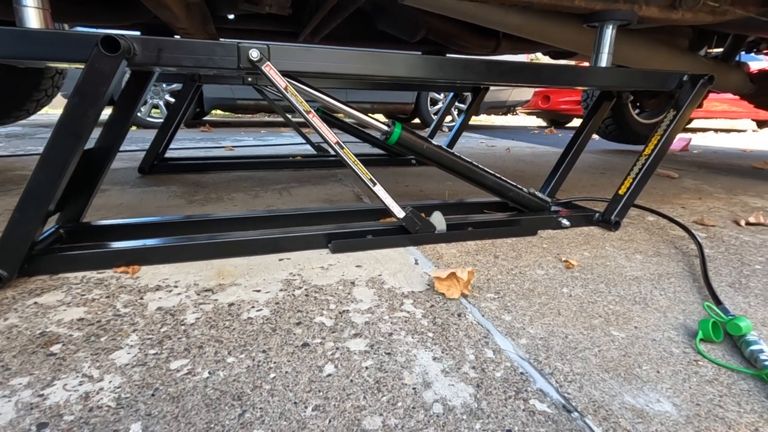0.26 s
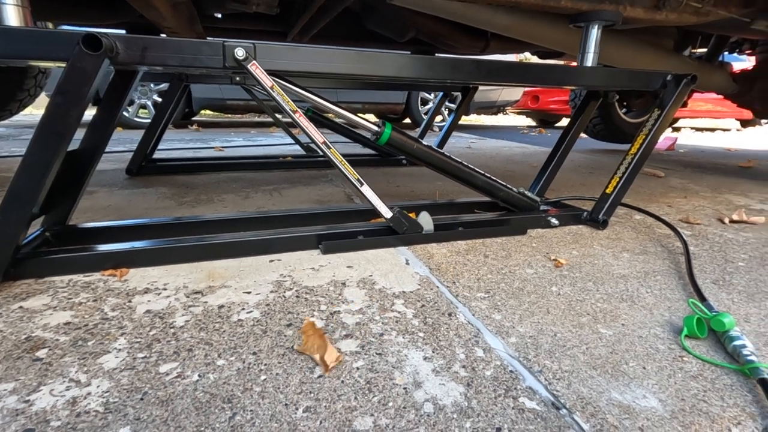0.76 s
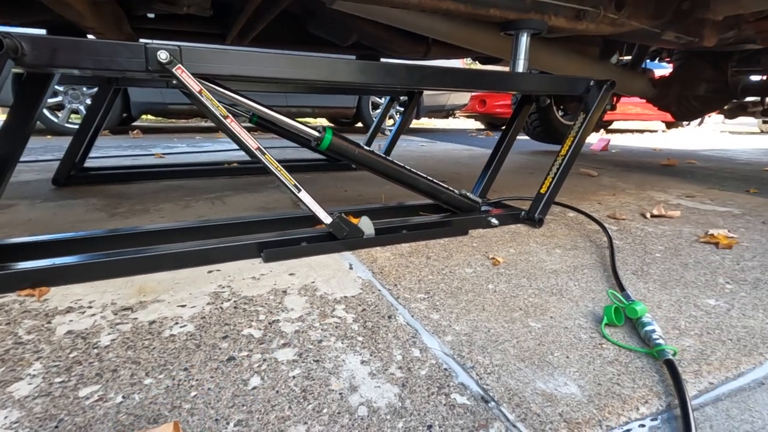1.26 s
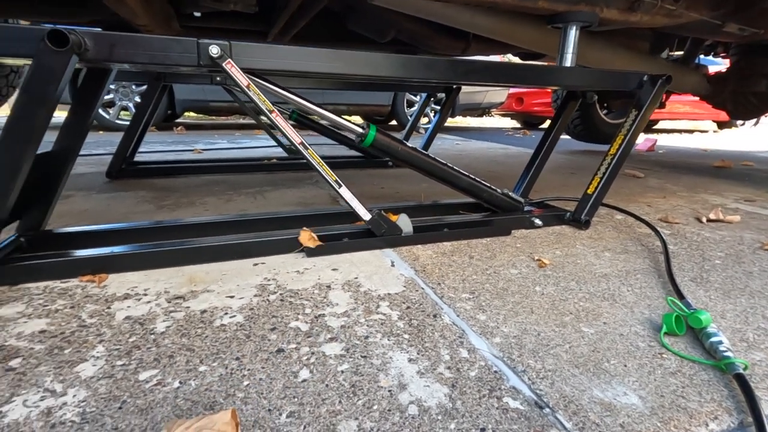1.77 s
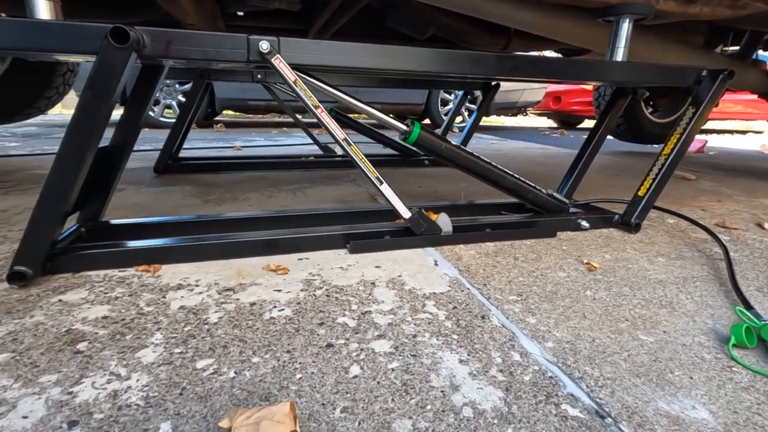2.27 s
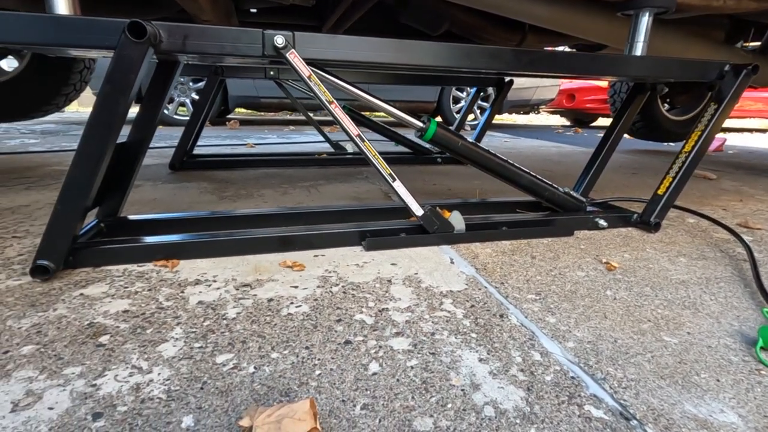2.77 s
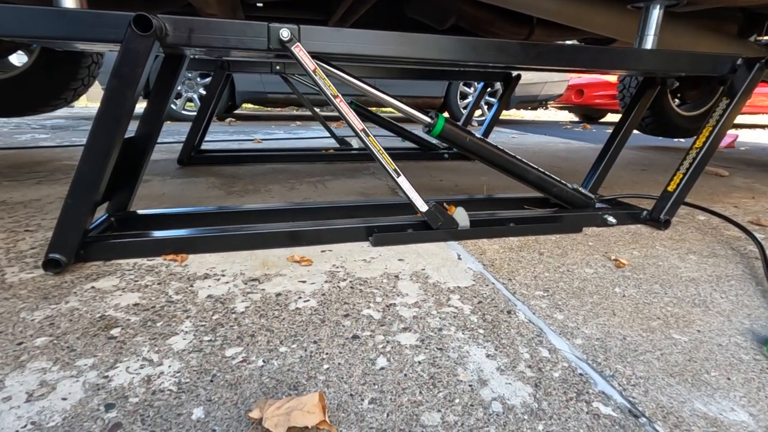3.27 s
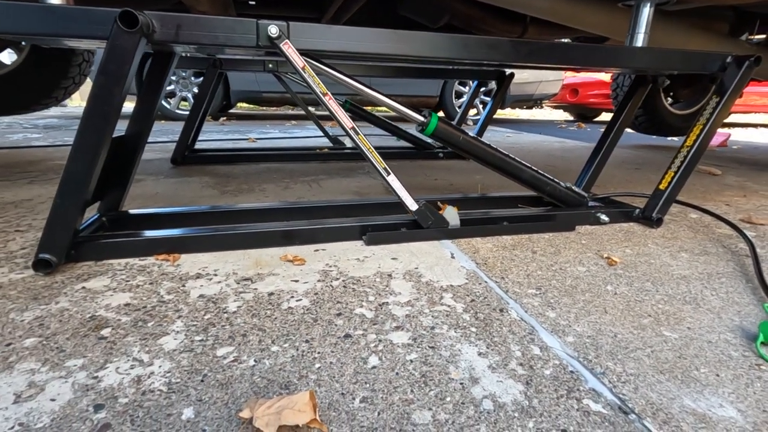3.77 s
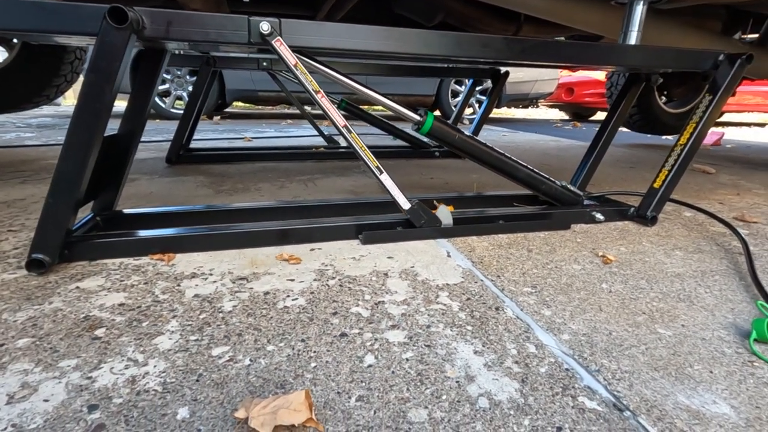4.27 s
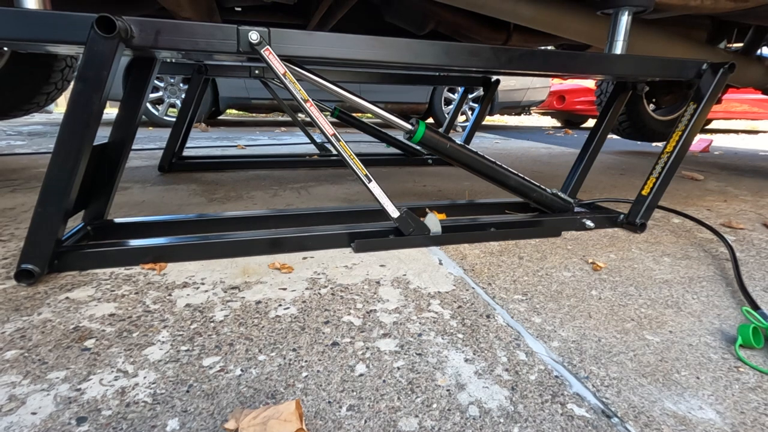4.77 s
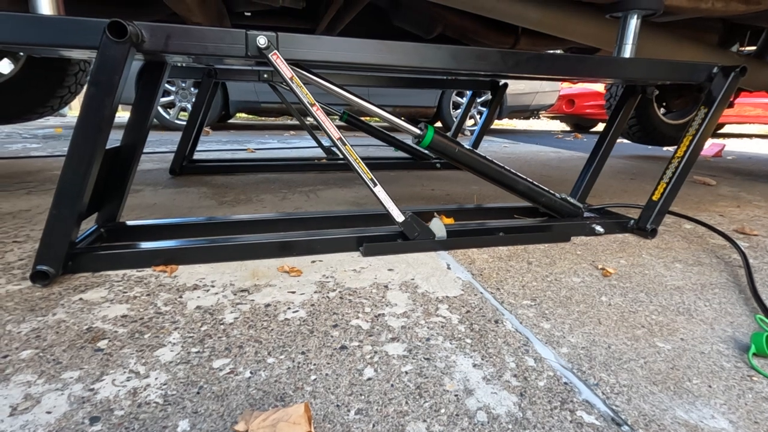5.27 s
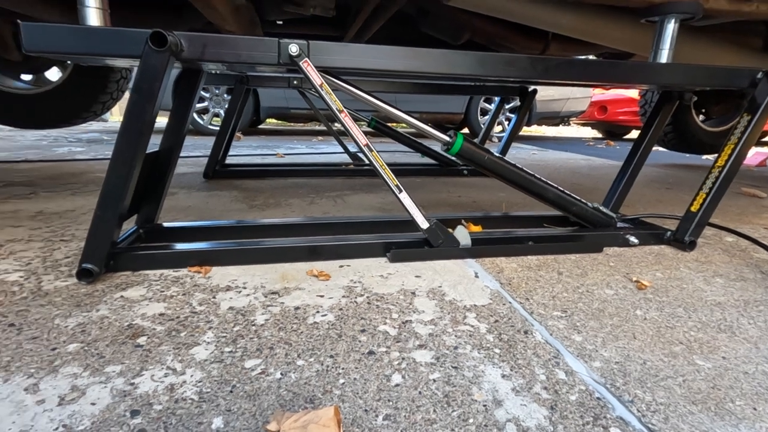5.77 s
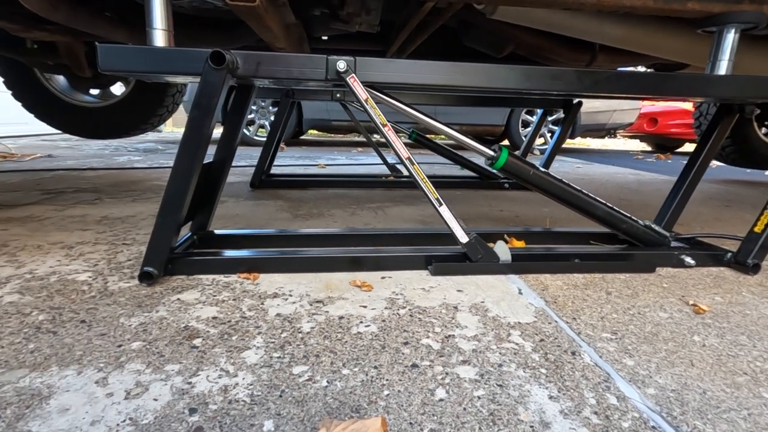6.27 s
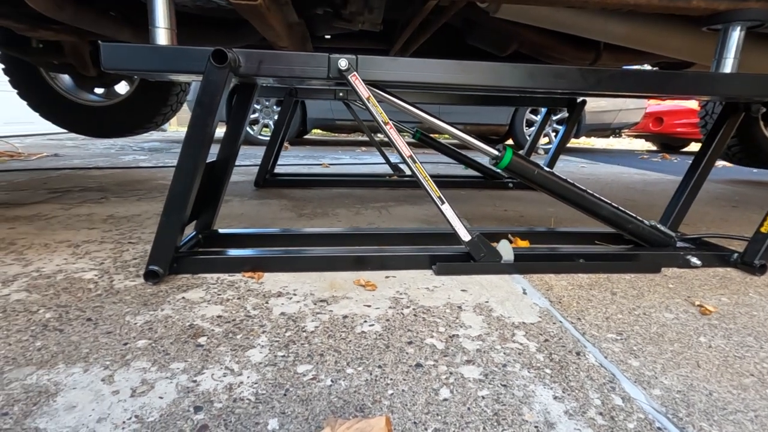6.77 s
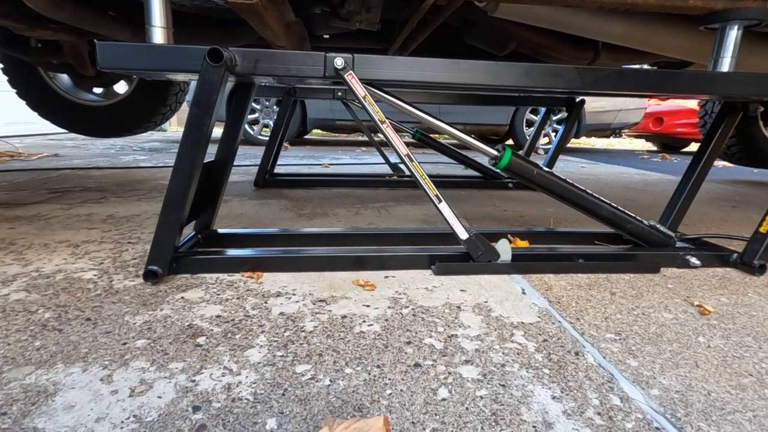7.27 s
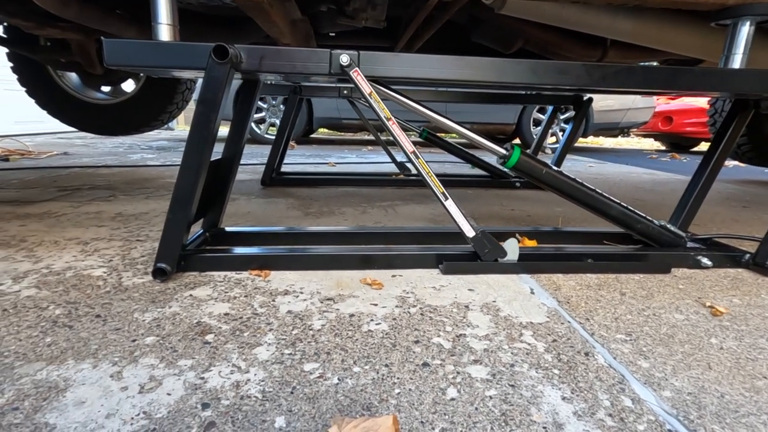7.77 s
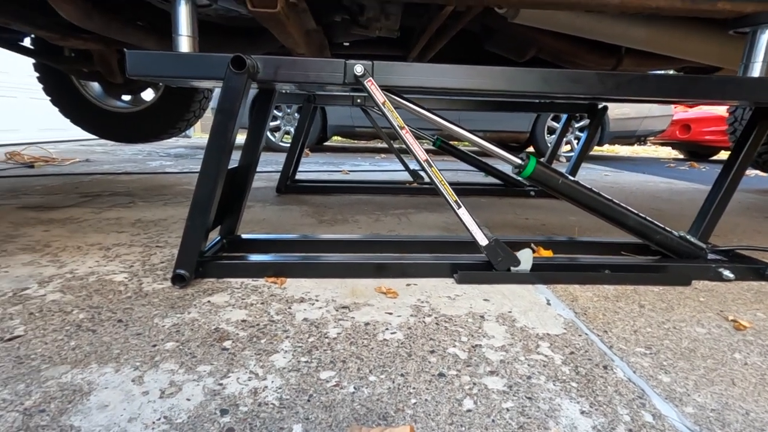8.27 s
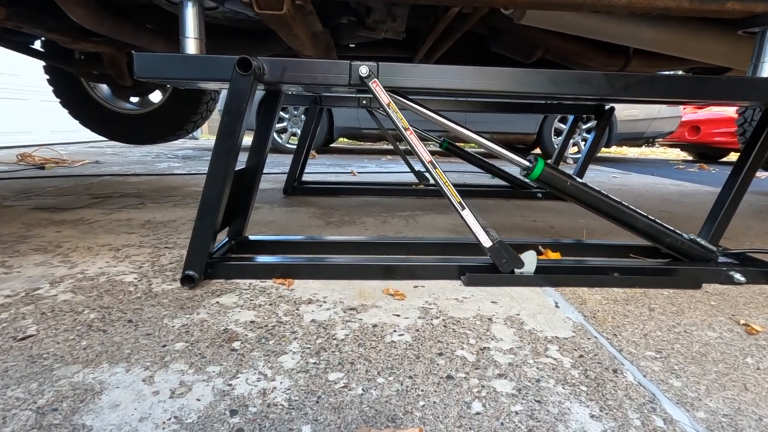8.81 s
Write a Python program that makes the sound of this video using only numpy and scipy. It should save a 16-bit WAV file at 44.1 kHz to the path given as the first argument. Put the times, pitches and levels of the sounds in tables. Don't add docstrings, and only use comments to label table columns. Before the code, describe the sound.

Close outdoor stereo pickup beside a steel lifting frame: constant nasal motor whine, mains hum and soft hiss. Brittle leaf snaps and scratches crowd the first two seconds, with lumpy low gusts until about four. Then a low drone grows beneath the whine, the lock bar clacks hollowly several times, and finally crashes into its catch.

```python
import sys
import numpy as np
from scipy import signal
from scipy.fft import irfft
from scipy.io import wavfile

SR = 44100
rng = np.random.default_rng(int(sys.argv[2]) if len(sys.argv) > 2 else 0)


def file_out(sig):
    cols = np.atleast_2d(sig).T
    lim = np.clip(cols, -1, 1)
    pcm = np.round(lim * 32767).astype(np.int16)
    wavfile.write(sys.argv[1], SR, pcm)


def decibels_to_gain(level_db):
    exponent = np.asarray(level_db, float) / 20
    return 10 ** exponent


N = 398663


def rms_one(x):
    return x / np.sqrt(np.mean(x ** 2) + 1e-20)


def in_time(rows):
    s, *columns = np.transpose(rows)
    return [np.interp(np.arange(N) / SR, s, c) for c in columns]


def at_hz(points, hz):
    table_hz, values = np.array(points)[:, 0], np.array(points)[:, 1]
    return np.interp(np.log(hz), np.log(np.maximum(table_hz, 1)), values)


def panned(x, db):
    return x * decibels_to_gain(np.multiply.outer([.5, -.5], db)).reshape(2, -1)


def two_sided(mid, side):
    return mid + side * [[1], [-1]]


def drift(rate):
    r = np.exp(-80 * np.pi * rate / SR)
    slow = signal.lfilter([1], [1, -2 * r, r * r], rng.standard_normal(N // 40 + 4002))[4000:]
    return np.interp(np.arange(N) / 40, np.arange(len(slow)), rms_one(slow - slow.mean()))


def band(x, low_hz, high_hz, order=2):
    return signal.sosfilt(signal.butter(order, [low_hz, high_hz], "band", fs=SR, output="sos"), x)


def ring(x, hz, t60):
    r, w = decibels_to_gain(-60 / (t60 * SR)), 2 * np.pi * hz / SR
    return signal.lfilter([0, np.sin(w)], [1, -2 * r * np.cos(w), r * r], x + 1e-18)


def coloured(white, spectrum, patchy_db):
    # (frequency [Hz], likeness [0 to 1])
    likeness = [(60, 0.97), (180, 0.49), (540, 0.45), (1640, 0.037), (4940, 0.52), (14900, 0.37)]
    out, edges = 0, 180 * 2 ** np.arange(0, 6.6, .5)
    for k, (low, high) in enumerate(zip(edges, edges[1:])):
        centre_hz = np.sqrt(low * high)
        mid, side = band(white[k % 2], low, high)
        alike = np.clip(at_hz(likeness, centre_hz), 0, 1)
        gain = decibels_to_gain(at_hz(spectrum, centre_hz) + patchy_db * drift(9.8))
        out = out + gain * two_sided(np.sqrt(1 + alike) * mid, np.sqrt(1 - alike) * side)
    return rms_one(out)


def pump(top_lift_db):
    # (time [s], speed [turns per s])
    speed = [(0.3, 58.66), (1.5, 58.71), (2.5, 58.75), (3.5, 58.77), (4.5, 58.81), (5.5, 58.82),
             (6.5, 58.86), (7.5, 58.9), (8.7, 58.91)]
    heights_s = [0, 3.0, 5.4, 9.04]
    turns = np.cumsum(in_time(speed)[0]) / SR
    angle = 2 * np.pi * turns
    orders, size = np.arange(10, 250), 16384
    phases = order_phases(orders, size)
    sides = panned(np.ones(len(orders)), 1 + 3 * rng.standard_normal(len(orders)))
    levels_db = order_levels(orders, speed[0][1], top_lift_db)
    place, out, t = turns % 1 * size, np.zeros((2, N)), np.arange(N) / SR
    for high, share in enumerate(np.eye(4)):
        lines = np.zeros((2, size // 2 + 1), complex)
        lines[:, orders] = decibels_to_gain(levels_db[high]) * sides * np.exp(2j * np.pi * phases[high]) * size / np.sqrt(2)
        weight = np.interp(t, heights_s, share)
        on = weight > 0
        waves = [np.interp(place[on], np.arange(size), wave) for wave in irfft(lines)]
        out[:, on] += weight[on] * np.array(waves)
    add_swells(out, angle, orders, phases, sides, heights_s)
    return out + off_tones(angle) + tooth_tone(angle), angle


def order_phases(orders, size):
    wobble = [(22, .1, .1, .1, .1), (33, .23, .18, .22, .12), (44, 0, -.07, -.1, -.17),
              (66, .1, .2, .11, -.14), (77, .3, .12, .11, .24), (88, .2, .02, .16, .24),
              (249, .1, .1, .1, .1)]
    family = np.round(orders / 11).astype(int)
    start, moment = rng.random((2, size))[:, family]
    tooth_phase = start + orders * moment
    loose = np.where(abs(orders - 11 * family) < 2, .015, .08)
    phases = tooth_phase + loose * rng.standard_normal(len(orders))
    phases = two_sided(phases, .022 * rng.standard_normal(len(orders)))
    teeth, *shifts = np.transpose(wobble)
    return [phases + np.interp(orders, teeth, shift) * (orders % 11 == 0) for shift in shifts]


def order_levels(orders, turns_per_s, top_lift_db):
    # (frequency [Hz], level [dB rms])
    weak = [(800, -67.5), (1500, -63), (2200, -100), (3000, -78), (4000, -107), (6000, -80), (9000, -129.5),
            (14500, -102)]
    # (shaft order, then level at four frame heights, low to high [dB rms])
    teeth = [(22, -54, -54, -56, -51), (33, -40, -48, -44, -38), (44, -63, -53, -61, -42),
             (55, -60, -77, -66, -81), (66, -45, -58, -61, -48), (77, -52, -50, -54, -66),
             (88, -47, -47, -60, -49), (99, -62, -66, -70, -81), (110, -60, -72, -72, -74),
             (121, -68, -72, -71, -72), (132, -73, -71, -68, -73), (143, -72, -86, -79, -86),
             (154, -68, -85, -68, -71), (165, -79, -65, -63, -70), (176, -72, -71, -65, -72),
             (187, -73, -73, -76, -73), (198, -77, -63, -70, -71), (209, -82, -84, -81, -79),
             (220, -80, -88, -78, -92)]
    # (shaft order, then level at four frame heights [dB rms])
    side_tones = [(10, -50, -52, -51, -56), (21, -60, -67, -76, -65), (30, -57, -60, -55, -53),
                  (32, -53, -56, -55, -47), (34, -51, -54, -49, -41), (35, -58, -60, -60, -59),
                  (36, -57, -63, -57, -56), (41, -59, -62, -56, -54), (42, -59, -61, -52, -57),
                  (43, -48, -53, -58, -60), (45, -50, -41, -49, -68), (47, -55, -64, -63, -64),
                  (53, -63, -59, -59, -63), (62, -64, -65, -61, -63), (64, -57, -69, -63, -60),
                  (65, -66, -63, -73, -52), (67, -46, -54, -47, -68), (68, -57, -51, -57, -68),
                  (69, -64, -58, -57, -68), (75, -65, -66, -64, -64), (76, -51, -55, -56, -53),
                  (78, -66, -52, -51, -53), (79, -65, -60, -61, -81), (86, -60, -78, -65, -64),
                  (87, -58, -76, -63, -78), (89, -64, -64, -64, -68), (98, -58, -64, -66, -76),
                  (100, -60, -67, -64, -65), (109, -62, -66, -62, -62), (111, -60, -68, -72, -68),
                  (131, -68, -79, -78, -70), (133, -69, -77, -75, -80), (163, -75, -79, -74, -70),
                  (164, -74, -85, -76, -75), (166, -76, -82, -76, -80), (175, -72, -77, -78, -80),
                  (177, -68, -88, -73, -77), (197, -74, -84, -85, -79), (199, -72, -79, -81, -77),
                  (242, -93, -112, -108, -97)]
    scatter_db = rng.normal(0, 4.5, (3, len(orders)))
    levels_db = []
    for high in range(4):
        level_db = at_hz(weak, orders * turns_per_s) + scatter_db[high % len(scatter_db)]
        for row in list(teeth) + list(side_tones):
            level_db[round(row[0]) - orders[0]] = row[1 + high] + top_lift_db * row[0] / 200
        levels_db.append(level_db)
    return levels_db


def add_swells(out, angle, orders, phases, sides, heights_s):
    # (shaft order, time [s], width [s], added level [dB rms])
    swell_rows = [(45, 5.2, 1.15, -50.5), (76.5, 5.8, 0.55, -59), (165, 8.85, 0.23, -55),
                  (65, 1.3, 0.31, -57), (67, 5.9, 2.2, -53.5), (77, 3.6, 0.4, -54), (112, 2.7, 1.5, -62),
                  (209, 6.4, .7, -76), (176, 2.4, 0.46, -70), (88, 2.23, 0.42, -48),
                  (45, 8.75, 0.59, -46.5), (165, 7.56, 0.58, -62), (78, 6.1, 0.59, -61),
                  (67.3, 2.13, 0.44, -48.5), (66.4, 6.75, 1.4, -49.5), (198, 5.5, 0.58, -63),
                  (198, 8.5, 0.56, -60), (176, 7.3, .7, -68), (44, 2.5, 0.28, -75)]
    t = np.arange(N) / SR
    for k, s, width, db in swell_rows:
        near = slice(round(max(s - 2 * width, 0) * SR), round((s + 2 * width) * SR))
        at = round(k) - orders[0]
        swell = decibels_to_gain(db) * np.exp(-((t[near] - s) / width) ** 2) * np.sqrt(2)
        height = np.argmin(abs(np.array(heights_s) - s))
        phase = 2 * np.pi * phases[height][:, [at]]
        out[:, near] += swell * sides[:, [at]] * np.cos(round(k) * angle[near] + phase)


def off_tones(angle):
    off_orders = [22.08, 26.15, 53.22]
    off_db = [
        (-66, -54),
        (-72, -46.5),
        (-44.5, -50.5, -44.5, -50, -44, -49.5),
    ]
    t, out = np.arange(N) / SR, 0
    for k, steps_db in zip(off_orders, off_db):
        level_db = np.interp(t, np.linspace(0, t[-1], len(steps_db)), steps_db)
        out = out + np.sqrt(2) * decibels_to_gain(level_db) * np.sin(k * angle + 1.5 * drift(1.5))
    return out


def tooth_tone(angle):
    # (time [s], level [dB rms])
    mesh = [(0.0, -38), (0.2, -41), (1.26, -38.5), (1.71, -39), (5.51, -32.5), (7.07, -33.5), (8.84, -38),
            (9.04, -41)]
    return panned(np.sqrt(2) * decibels_to_gain(in_time(mesh)[0]) * np.sin(11 * angle), -1.2)


def hum():
    # (mains multiple, level [dB rms])
    hum_tones = [(4, -56.5), (6, -49.5), (7, -63), (8, -52), (9, -55.5), (10, -45), (12, -58)]
    t, out = np.arange(N) / SR, 0
    for k, db in hum_tones:
        tone = np.sin(2 * np.pi * (round(k) * 60 * t + rng.random()))
        out = out + np.sqrt(2) * decibels_to_gain(db + 1.2 * drift(11.5)) * tone
    return out


def oil_hiss(angle, level_db):
    # (frequency [Hz], level [dB per Hz])
    hiss = [(214, 2), (428, 1.5), (605, 1.5), (1712, -25), (2421, -32), (3424, -8), (9686, -21.5),
            (13700, -14)]
    chop = decibels_to_gain(0.26 * np.cos(angle) + 1.8 * np.cos(11 * angle))
    return decibels_to_gain(level_db) * chop * coloured(rng.standard_normal((2, 2, N)), hiss, patchy_db=2.2)


def boom():
    # (time [s], level [dB])
    boom_level = [(0.0, -41.5), (3.4, -34), (4.2, -29), (4.63, -30.5), (6.9, -25.5), (7.35, -26),
                  (7.96, -28), (8.3, -27.5), (8.62, -29), (8.85, -28.5), (9.04, -28)]
    # (frequency [Hz], width [Hz], level [dB])
    resonances = [(116.5, 14.7, -7.0), (133.0, 19.6, -9.5), (146.0, 15.5, -8.5),
                  (88.0, 26.0, -9.0), (215.3, 6.4, -14.0), (249.3, 6.3, -15.5)]
    out = 0
    for hz, width_hz, db in resonances:
        mid, side = band(rng.standard_normal((2, N)), hz - width_hz / 2, hz + width_hz / 2, order=1)
        out = out + decibels_to_gain(db) * two_sided(rms_one(mid), 0.018 * rms_one(side))
    drone = np.sin(2 * np.pi * np.cumsum(130 + 1.52 * drift(1.96)) / SR) * decibels_to_gain(0.5 + 3.2 * drift(9.5))
    return decibels_to_gain(in_time(boom_level)[0] - 1.5) * (out + drone)


def knocks():
    # (time [s], peak level [dB], clack pitch [Hz], ringing level [dB])
    blows = [(0.2154, -12, 2280, -15), (0.2400, 3.5, 2200, -11), (1.794, -15.5, 2020, -8.5),
             (2.451, -26, 2250, -10), (3.577, -29, 2200, -11), (5.0406, -22.5, 2870, -8),
             (5.306, -23, 2070, -8), (6.9668, -10.5, 2080, -1), (7.996, -4.5, 2020, -5.5),
             (8.05, -15.5, 2010, -2), (8.104, -24, 1920, -2), (8.6624, -28, 2780, 8), (8.955, -19, 2110, 1),
             (8.996, -19, 1466, 5.5)]
    # (frequency [Hz], level with frame low [dB], level with frame high [dB])
    modes = [(710, -17, 1), (1114, 3, -23), (1272, -4.5, -8), (1433, -2, -6), (1685, -18, 1),
             (1845, 5.5, -1), (2120, 0, -13), (2300, -8, -16), (2410, -3, -8), (2640, 4, 0),
             (2870, -11, -14), (3018, 10.5, -20), (3292, 6, -28), (3830, -2, -32)]
    out, t = np.zeros(N), np.arange(SR // 4) / SR
    chances = rng.standard_normal((len(blows), len(modes) + SR // 4))
    for (s, peak_db, clack_hz, ring_db), luck in zip(blows, chances):
        at = round(s * SR)
        tilt_db = 22.5 - 3.4 * s
        bounce_db = -19.5 + 1.96 * s
        blow = np.zeros(SR // 4)
        blow[:900] = 0.15 * luck[-900:] * decibels_to_gain(-60 * t[:900] / 0.023)
        blow[0], blow[round(.0045 * SR)] = 1, decibels_to_gain(bounce_db)
        clack = ring(ring(blow, clack_hz, 0.0095), clack_hz * 1.047, 0.0036)
        rings = 0
        for (hz, low_db, high_db), share_db in zip(modes, luck):
            mode_db = low_db + (high_db - low_db) * s * SR / N + share_db
            fade = .13 * (2000 / hz) ** .4
            rings = rings + decibels_to_gain(mode_db) * ring(blow, hz, fade)
        rings = band(rings, 950 - 35 * s, 4600 - 230 * s, order=3) / 2.32
        swing = 1 - np.exp(-t / 0.0024)
        rattle = band(luck[len(modes):], 1060, 2300 * 2 ** (tilt_db / 25)) * decibels_to_gain(ring_db - 12 - 60 * t / 0.22)
        sound = clack / np.abs(clack).max() + decibels_to_gain(ring_db - 8.5) * rings * swing + rattle
        out[at:at + len(blow)] += decibels_to_gain(peak_db) * sound[:N - at]
    return out


def under_truck(x):
    out = np.array([x, x])
    # (side: 0 left, 1 right, delay [s], level [dB])
    echoes = [(1, .0063, -16), (0, .0087, -15), (0, .0127, -12), (1, 0.0145, -12), (0, 0.018, -15), (1, 0.021, -17)]
    for side, lag_s, db in echoes:
        lag = int(lag_s * SR)
        out[side, lag:] += decibels_to_gain(db) * x[:-lag]
    return out


def latch():
    # (low edge [Hz], high edge [Hz], level [dB rms])
    crash_bands = [(1060, 1320, -3), (1570, 3000, -5), (3700, 4140, -9), (4900, 10700, -10.5),
                   (304, 1900, -16)]
    at, out = round(9.0305 * SR), np.zeros((2, N))
    rise = np.clip(np.arange(N - at) / SR / 0.0014, 0, 1)
    for low_hz, high_hz, db in crash_bands:
        mid, side = band(rng.standard_normal((2, 4000)), low_hz, high_hz)
        crash = two_sided(rms_one(mid), .22 * rms_one(side))
        out[:, at:] += decibels_to_gain(db) * crash[:, at - N:] * rise
    return out


def leaves():
    # (frequency [Hz], level [dB per Hz])
    leaf_colour = [(530, -50), (900, -8), (1211, -7.5), (1712, -9.5), (2880, -9.5), (4010, -8),
                   (11300, -21), (15300, -67)]
    # (time [s], level [dB])
    rustle = [(0.0, -40), (0.17, -38.5), (0.45, -43.5), (0.63, -36), (0.8, -51.5), (0.93, -50),
              (0.955, -34), (1.03, -43), (1.15, -43), (1.4, -41.5), (1.6, -54), (1.96, -49.5), (2.9, -48),
              (5.51, -54), (5.9, -45), (6.1, -51.5), (6.7, -41), (7.02, -51.5), (8.58, -56.5), (9.04, -50)]
    # (time [s], peak level [dB], low part [dB], fade [s])
    tumble = [(0.024, -14, 3, 0.073), (0.132, -11.5, -7, 0.06), (0.217, -10, -9, 0.085),
              (0.286, -17, -8, 0.1), (0.299, -17.5, 0, 0.2), (0.42, -15, -5.5, 0.22),
              (0.482, -20.5, -12, 0.071), (0.5337, -23, -6, 0.079), (0.565, -19, -6, 0.057),
              (0.629, -13.5, -8, 0.13), (0.806, -20, -5, 0.15), (0.823, -19.5, -9, 0.27),
              (0.864, -18.5, -2, 0.21), (0.909, -8.5, -14, 0.075), (0.923, -20, -9, 0.062),
              (0.9614, -16, -14, 0.034), (0.974, -15, -4, 0.12), (1.006, -14, -4, 0.083),
              (1.016, -17.5, -1, 0.22), (1.038, -19.5, -9, 0.47), (1.0823, -25, -9, 0.12),
              (1.096, -20, -6, 0.13), (1.117, -13, -3.5, 0.13), (1.406, -18.5, -29, 0.35),
              (1.587, -22.5, 3, 0.19), (1.63, -25, -4, 0.18), (1.6693, -22, -8, 0.055),
              (1.704, -22, -15, 0.031), (1.781, -25, -7, 0.19), (1.794, -18, -5, 0.079),
              (1.896, -21, -26, 0.14), (1.9802, -15.5, -18, 0.14)]
    # (time [s], peak level [dB], fade [s])
    strays = [(2.9294, -27, 0.58), (3.11, -17, 0.021), (3.1994, -24, 0.031), (3.4624, -36, 0.081),
              (4.332, -22.5, 0.085), (5.0396, -26, 0.26), (5.165, -33, 0.2), (5.307, -21, 0.23),
              (5.5812, -24, 0.05), (6.232, -17.5, 0.052), (6.2466, -11, 0.18), (6.256, -34, 0.084),
              (6.4404, -22, 0.042), (8.1312, -22, 0.08), (9.022, -13.5, 0.041)]
    stray_low_db, far_from_s, far_top_hz = -7, 2.1, 8300
    catches = np.flatnonzero(rng.random(N) < 2500 / SR)
    sizes, shape = np.full((2, 2, N), 1e-18), (2, 2, len(catches))
    strength_db = 1.7 * np.minimum(rng.exponential(1, shape), 5)
    sizes[..., catches] = decibels_to_gain(strength_db) * rng.choice([-1, 1], shape)
    grit = panned(coloured(sizes, leaf_colour, patchy_db=2.5), 3.0)
    bright, dull = rms_one(band(grit, 2440, 18000)), rms_one(band(grit, 1340, 3850))

    level_db, = in_time(rustle)
    low_db = -48 - level_db + 0.29 * (level_db - level_db.mean())
    far = np.arange(N) > far_from_s * SR
    scrape = np.where(far, rms_one(band(grit, 3550, far_top_hz, order=1)), bright)
    drag = decibels_to_gain(level_db + 5.0 + 0.93 * drift(72)) * (scrape + decibels_to_gain(low_db) * dull)

    taps = np.array(list(tumble) + [(s, db, stray_low_db, fade) for s, db, fade in strays])
    bright_taps = bright * fading(taps, taps[:, 1] - 8.0)
    dull_taps = dull * fading(taps, taps[:, 1] + taps[:, 2] - 10.0)
    return drag, bright_taps + dull_taps


def fading(rows, db):
    out = np.zeros(N)
    for row, level_db in zip(rows, db):
        at, fade = round(row[0] * SR), max(row[-1], .005)
        t = np.arange(min(int(fade * SR), N - at)) / SR
        crack = 1 + 0.17 * decibels_to_gain(-60 * t / 0.0018)
        out[at:at + len(t)] += decibels_to_gain(level_db - 60 * t / fade) * np.minimum(t / 0.000047, 1) * crack
    return out


def snaps():
    # (time [s], peak level [dB], ring pitch [Hz])
    snap_rows = [(0.022, -17, 3340), (0.023, -24, 6000), (0.1304, -16, 4500), (0.1322, -15.5, 2050),
                 (0.1898, -22, 7000), (0.2162, -14, 2530), (0.2982, -17, 2070), (0.301, -23, 6600),
                 (0.3165, -34, 11500), (0.3255, -31, 11500), (0.335, -26, 6640), (0.383, -31, 6900),
                 (0.389, -28, 6900), (0.4218, -15, 2640), (0.4253, -14, 3400), (0.564, -22, 10000),
                 (0.6293, -11, 4540), (0.649, -21, 3900), (0.8043, -27, 2000), (0.824, -20, 3220),
                 (0.8825, -21, 3700), (0.91, -3.5, 4800), (0.912, -17, 3600), (0.9102, -19, 8300),
                 (0.924, -25, 4000), (0.9619, -29, 5730), (0.974, -14, 2150), (0.9862, -26, 10500),
                 (1.0057, -14, 3320), (1.009, -23, 1500), (1.0175, -22, 2460), (1.038, -30, 3500),
                 (1.069, -17, 2300), (1.085, -16, 2200), (1.098, -22, 2100), (1.102, -22, 11500),
                 (1.1155, -17, 4900), (1.672, -17, 4100), (1.7014, -28, 4000), (1.7817, -26, 6500),
                 (1.786, -22, 5500), (1.79, -22, 7000), (1.7945, -21, 3000), (1.586, -23, 3280),
                 (1.596, -24, 6500), (1.9806, -37, 2930), (1.795, -26, 10800), (1.897, -22, 6450),
                 (1.9803, -19, 11600), (2.3086, -25, 2120), (2.437, -26, 4200), (2.457, -27, 1790),
                 (3.462, -28, 4200), (3.466, -28, 3300), (4.3329, -23, 1960), (5.0392, -28, 5000),
                 (5.057, -26, 2900), (5.168, -28, 2700), (6.246, -16, 7500), (6.248, -11.5, 1900),
                 (6.257, -17, 1810)]
    out = np.zeros(N)
    for s, db, hz in snap_rows:
        at = round(s * SR)
        clicks = np.zeros(1200)
        clicks[0], clicks[round(.0009 * SR)] = 1, -decibels_to_gain(-31.0)
        sizzle = decibels_to_gain(-7.5) * ring(clicks, 10000, 0.0044) + decibels_to_gain(-2.0) * ring(clicks, 6730, 0.0041)
        sizzle_db = 2.9 * np.log2(min(hz, 5000) / 5000)
        tick = ring(clicks, hz, 0.0029 + 20.0 / hz) + decibels_to_gain(sizzle_db) * sizzle
        out[at:at + len(tick)] += decibels_to_gain(db + 0.5) * tick
    return panned(out, 1.3)


def wind(left_db_per_db):
    level_db, upper_db = gusts()
    out, puffs = 0, drift(32.7)
    # (low edge [Hz], high edge [Hz], level [dB], lump rate [Hz], difference between the ports)
    swirls = [(20.4, 44.5, -0.5 + 1.054 * level_db, 11.0, 0.28),
              (54.2, 87.3, -7.0 + level_db, 21.5, 0.17),
              (107.6, 167.3, -7.5 + level_db + upper_db * .5, 26.7, 0.28),
              (165, 258, -15.0 + level_db + upper_db, 45.5, 0.67)]
    for low_hz, high_hz, db, lumps, apart in swirls:
        mid, side = band(rng.standard_normal((2, N)), low_hz, high_hz)
        gain = decibels_to_gain(db + 1.36 * drift(lumps) + 0.14 * lumps * puffs)
        out = out + gain * two_sided(rms_one(mid), 0.99 * apart * rms_one(side))
    return panned(out, left_db_per_db * np.clip(level_db + 33.5, 0, 18))


def gusts():
    # (start of full strength [s], hold [s], level [dB], small eddies [dB])
    gust_rows = [(0.086, 0.043, -18, 0), (0.112, 0.063, -10.5, -29), (0.25, 0.026, -18.5, -29),
                 (0.401, 0.016, -18.5, -12), (0.579, 0.027, -7, -14.5), (0.687, 0.039, -13.5, 5),
                 (0.79, 0.19, -22, -13), (1.285, 0.012, -6, -19), (1.357, 0.024, -9, -13),
                 (1.445, 0.08, -8, -3.5), (1.583, 0.075, -9, -5), (1.703, 0.13, -16, -8),
                 (1.834, 0.029, -13.5, -16), (1.95, 0.021, -15, -33), (2.135, 0.13, -32, -29),
                 (2.546, 0.013, -14.5, -8), (2.686, 0.032, -10, -8.5), (2.957, 0.059, -20, -5.5),
                 (3.318, 0.094, -22, -22), (3.781, 0.074, -15.5, -6), (3.956, 0.017, -16.5, -22),
                 (4.043, 0.026, -14.5, -8.5), (4.14, 0.034, -17, -24), (4.195, 0.06, -11, -14.5),
                 (4.323, 0.02, -19.5, -7)]
    # (time [s], level [dB])
    breeze = [(0, -22), (.5, -29.5), (1.0, -29.5), (2.1, -25.5), (3.3, -30), (3.52, -39), (3.7, -24.5),
              (4.4, -27.5), (4.55, -37), (9.04, -36.5)]
    rise_db_per_s, fall_db_per_s, breeze_eddy_db = 462, 248, -10
    t = np.arange(0, N, 160) / SR
    s, hold, db, eddy_db = np.transpose(gust_rows)[:, :, None]
    levels = db - rise_db_per_s * np.maximum(s - t, 0) - fall_db_per_s * np.maximum(t - s - hold, 0)
    levels = np.vstack([levels, np.interp(t, *np.transpose(breeze))])
    power = decibels_to_gain(2 * levels)
    total = power.sum(axis=0)
    eddies = (power * np.vstack([eddy_db, [[breeze_eddy_db]]])).sum(axis=0) / total
    return [np.interp(np.arange(N) / SR, t, c) for c in (10 * np.log10(total), eddies)]


def scene():
    tones, angle = pump(top_lift_db=4.5)
    drag, taps = leaves()
    steady = tones + panned(hum(), 1.0) + oil_hiss(angle, level_db=-45.0) + boom() + drag
    steady_cut = signal.sosfilt(signal.butter(10, 13600, fs=SR, output="sos"), steady)
    return steady_cut + under_truck(knocks()) + latch() + taps + snaps() + wind(left_db_per_db=-0.27)


def band_limit(x):
    return signal.sosfilt(signal.butter(12, 15470, fs=SR, output="sos"), x)


def record(dry):
    heard = signal.sosfilt(signal.butter(4, 13800, fs=SR, output="sos"), dry)
    return band_limit(np.clip(heard, -1, 1))


dry = scene()
out = record(dry)
file_out(out)
```